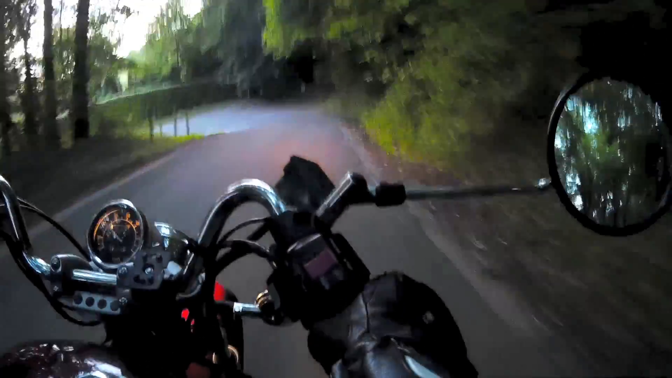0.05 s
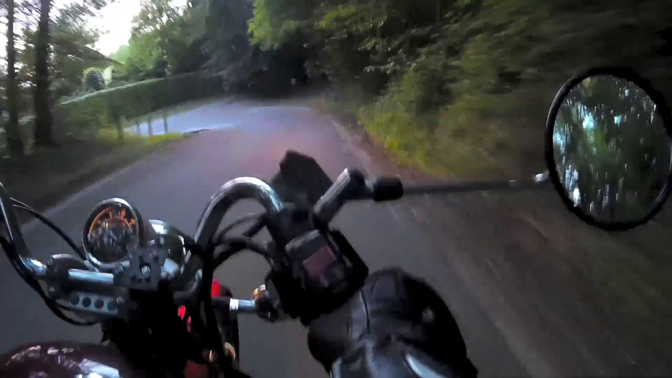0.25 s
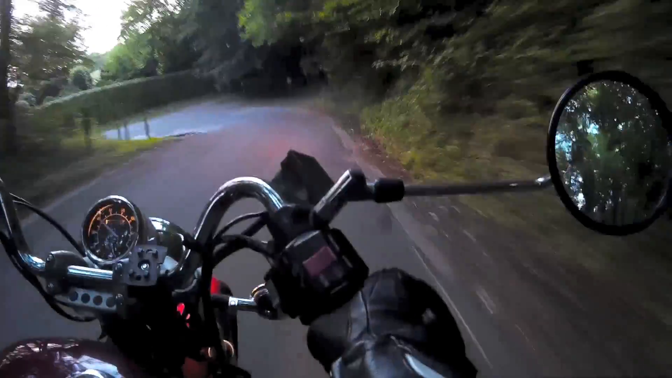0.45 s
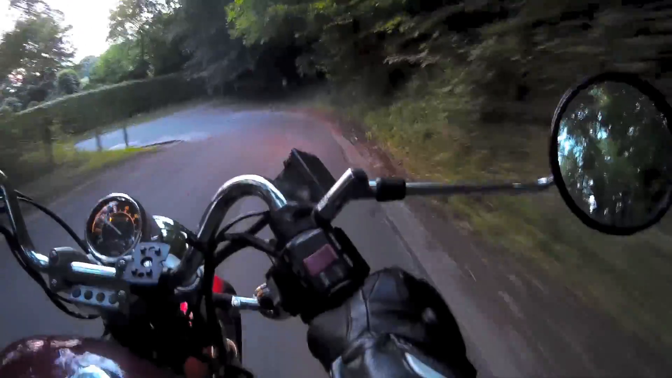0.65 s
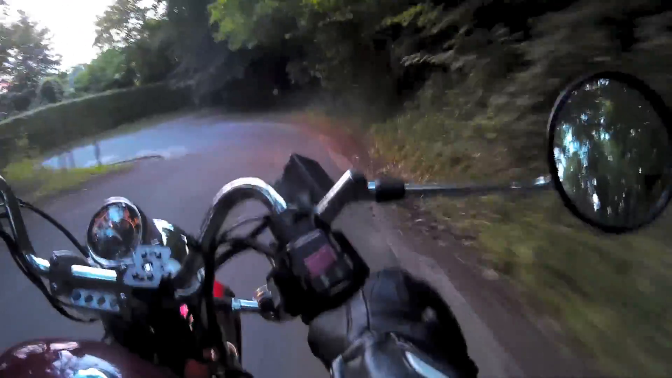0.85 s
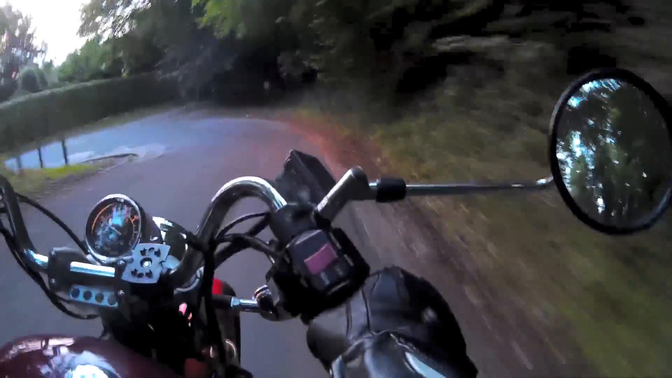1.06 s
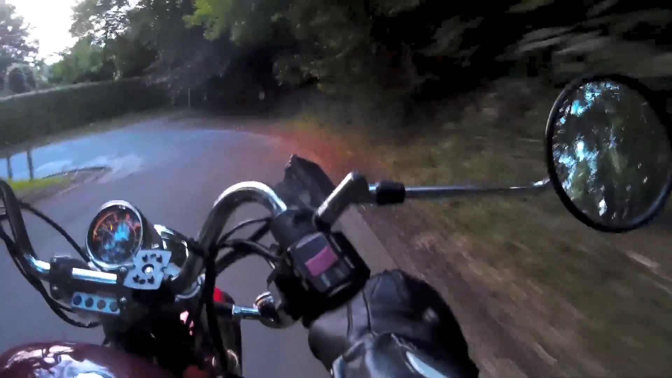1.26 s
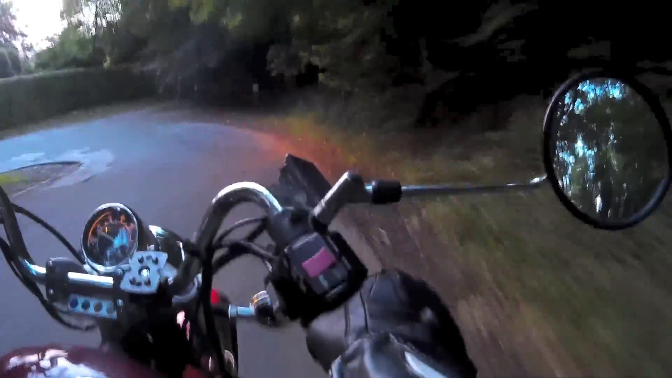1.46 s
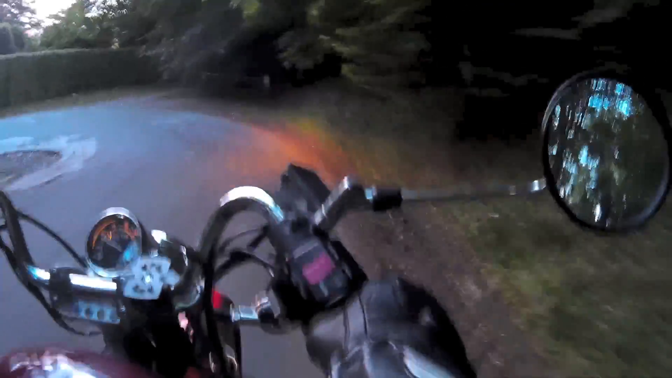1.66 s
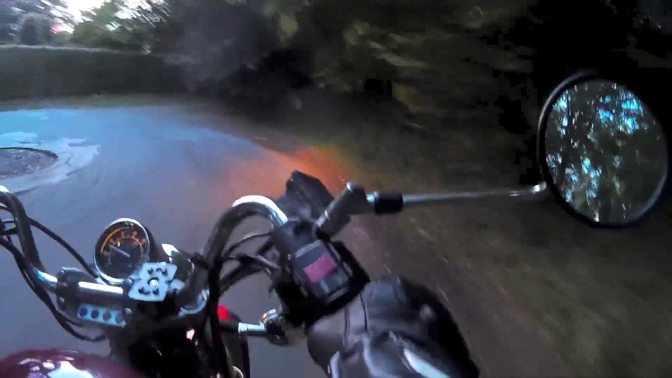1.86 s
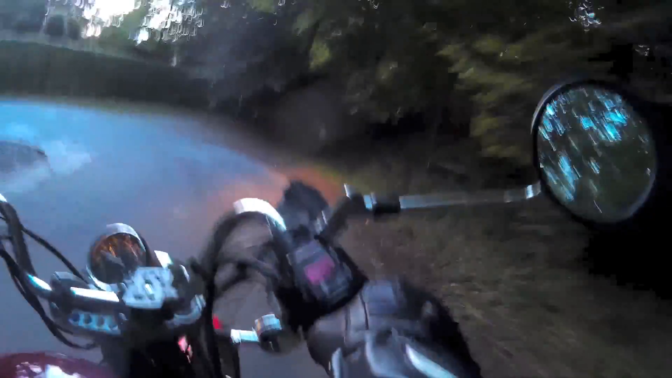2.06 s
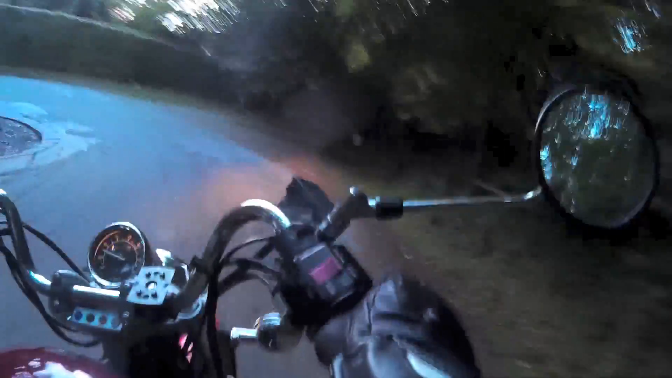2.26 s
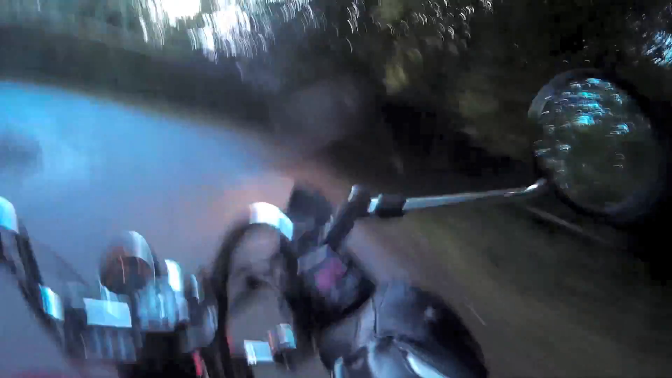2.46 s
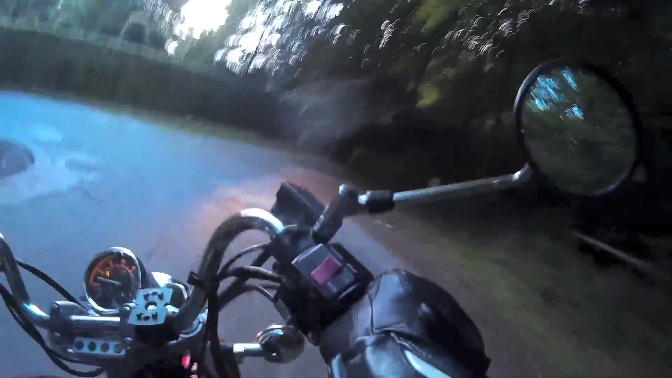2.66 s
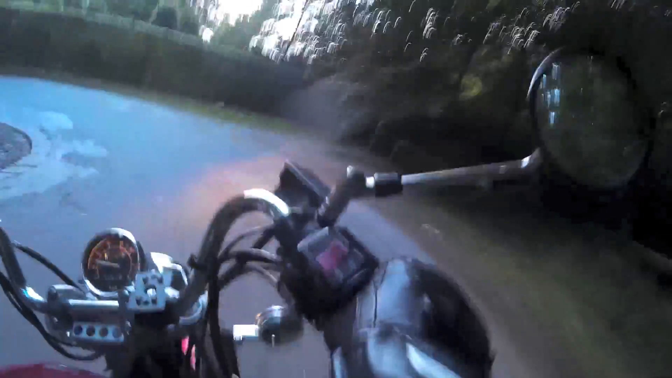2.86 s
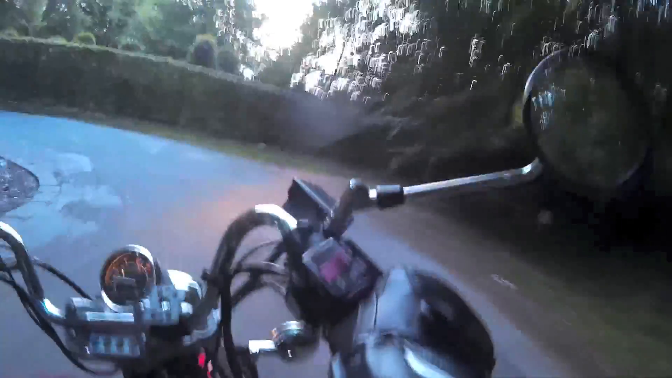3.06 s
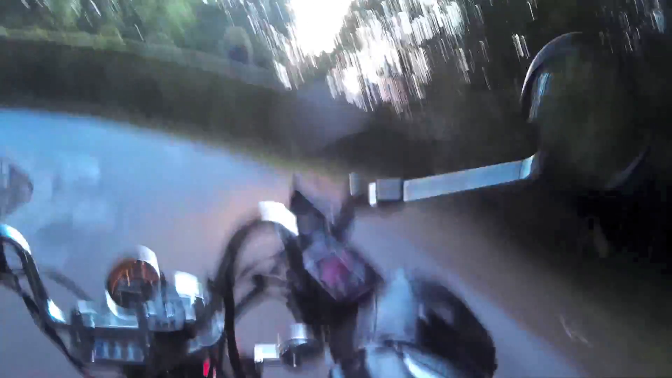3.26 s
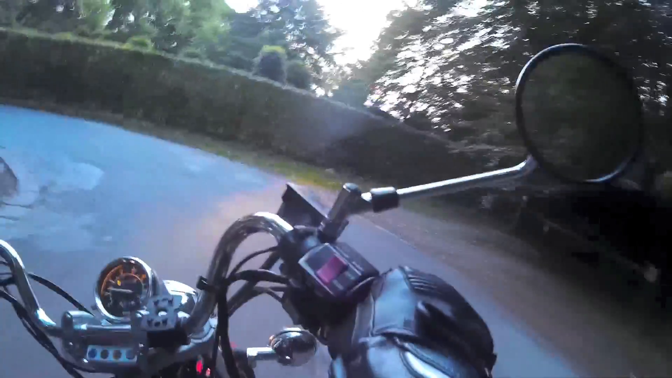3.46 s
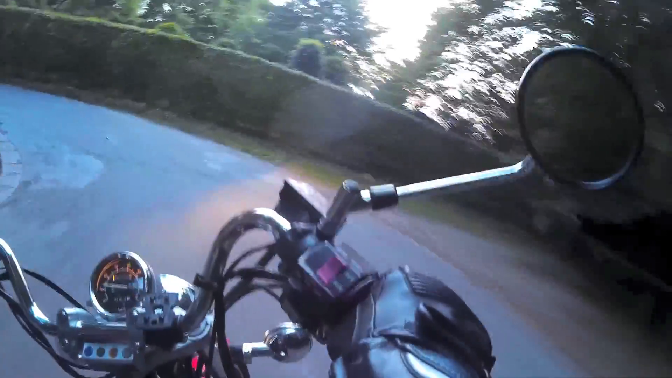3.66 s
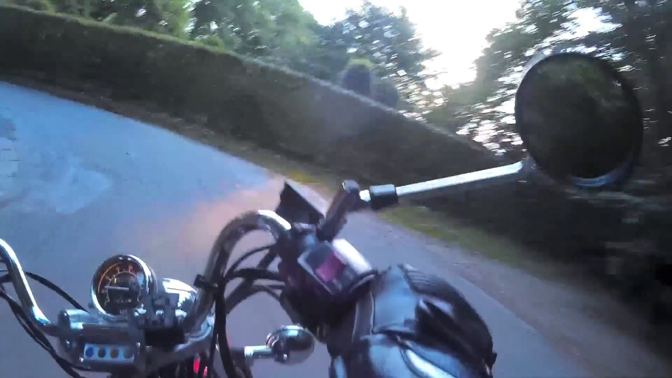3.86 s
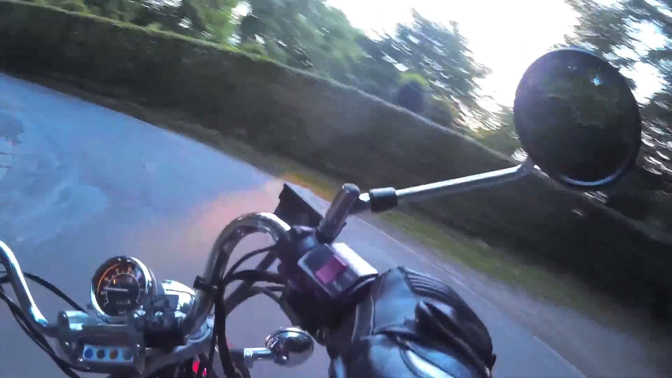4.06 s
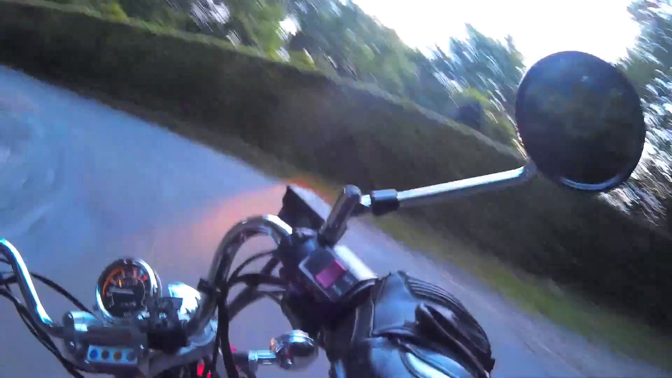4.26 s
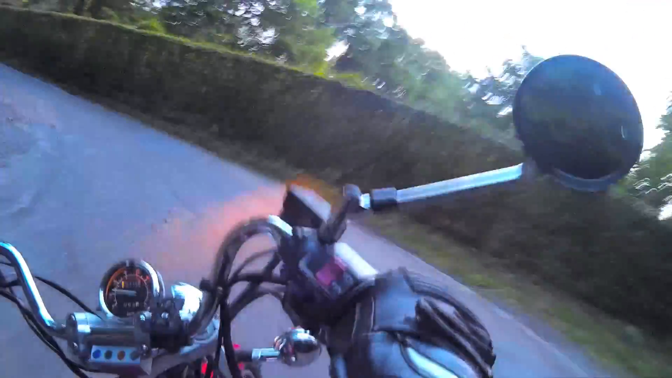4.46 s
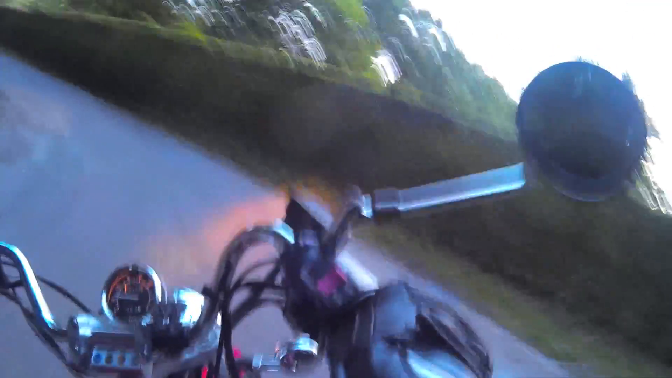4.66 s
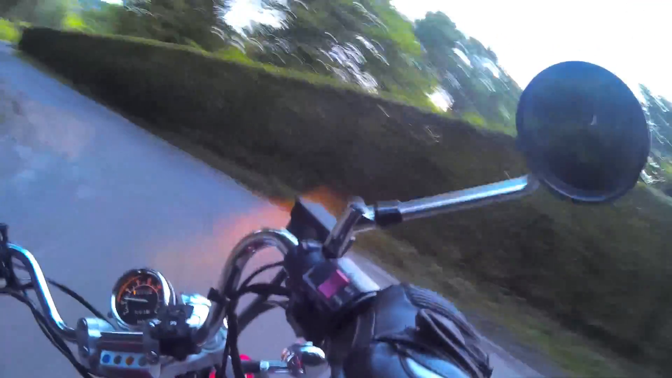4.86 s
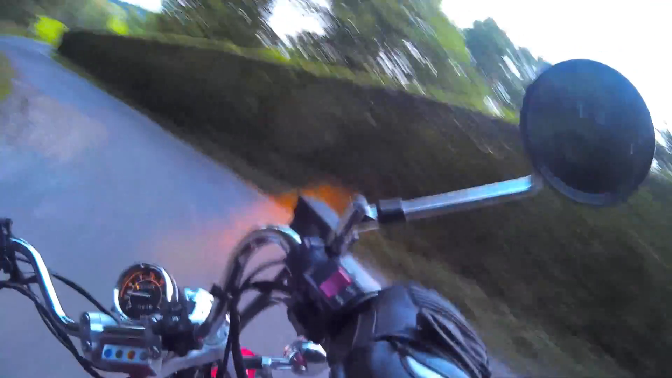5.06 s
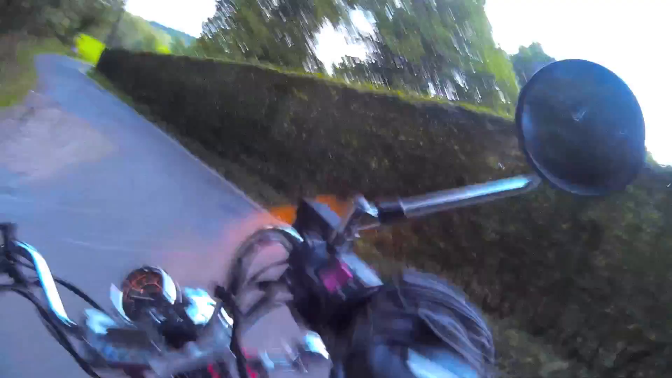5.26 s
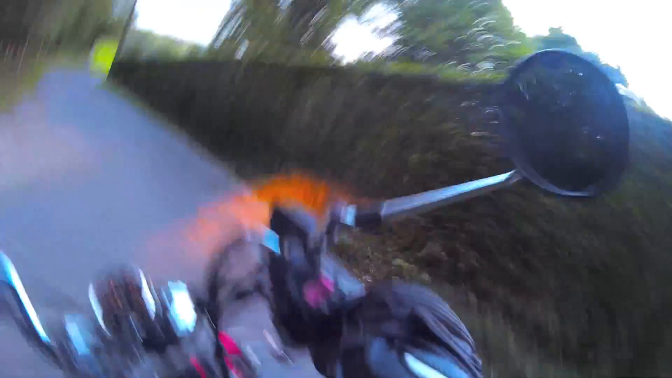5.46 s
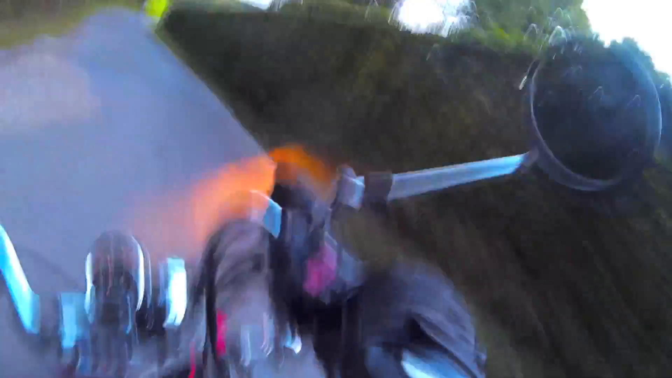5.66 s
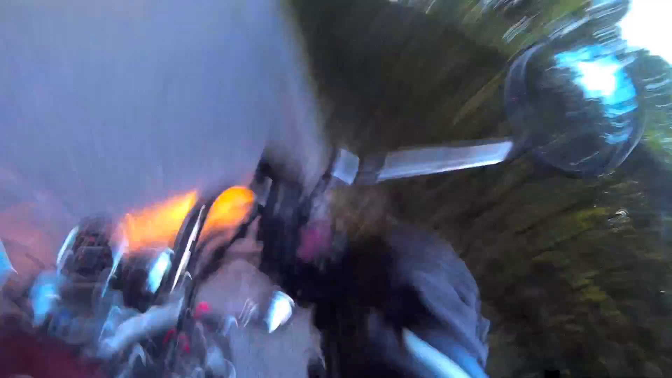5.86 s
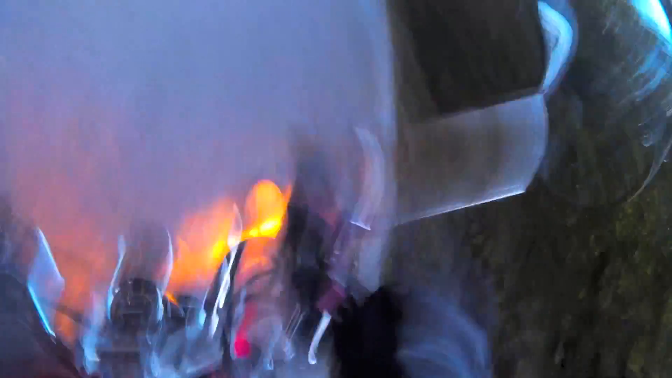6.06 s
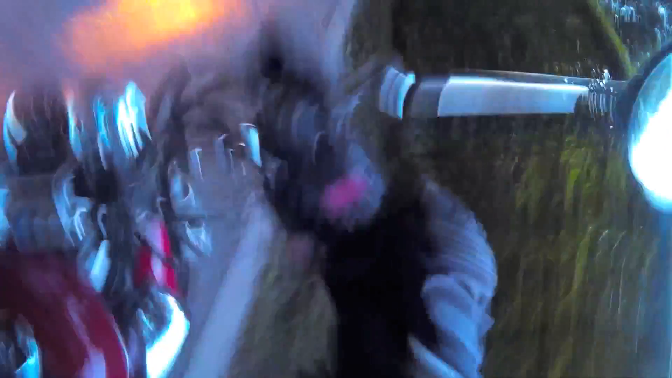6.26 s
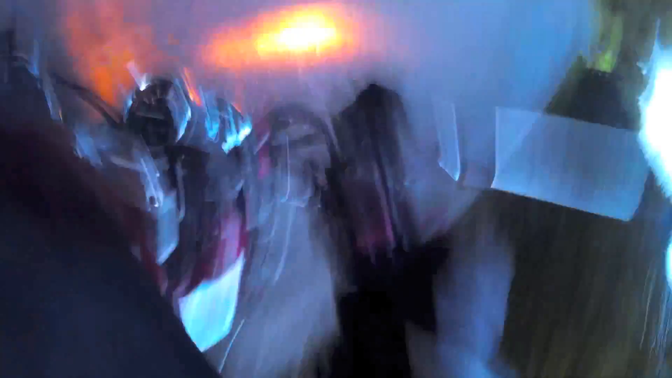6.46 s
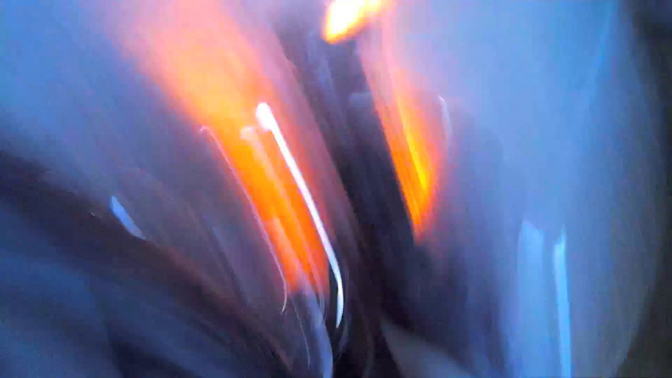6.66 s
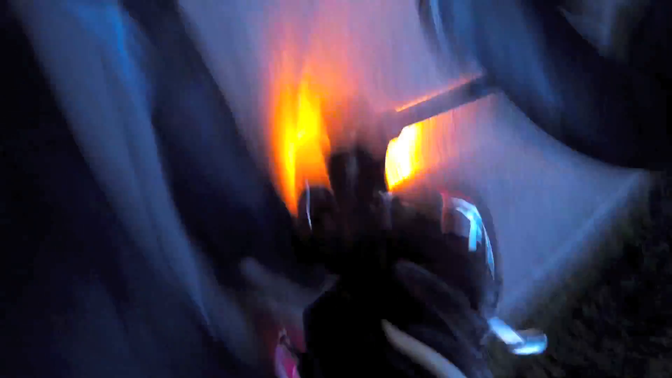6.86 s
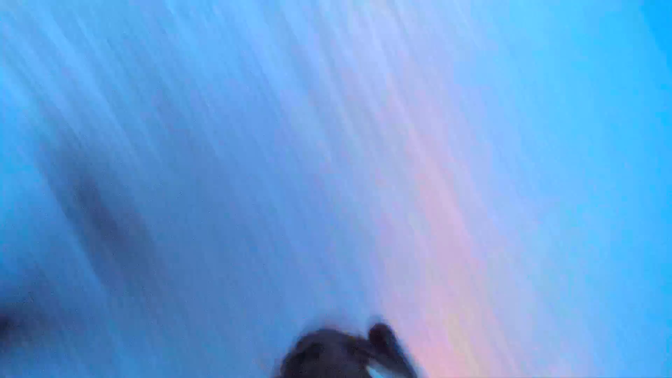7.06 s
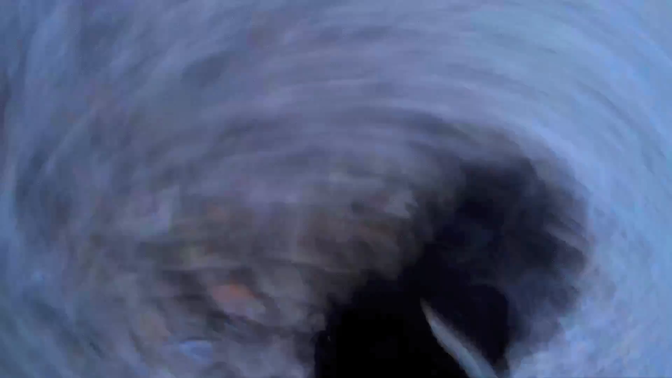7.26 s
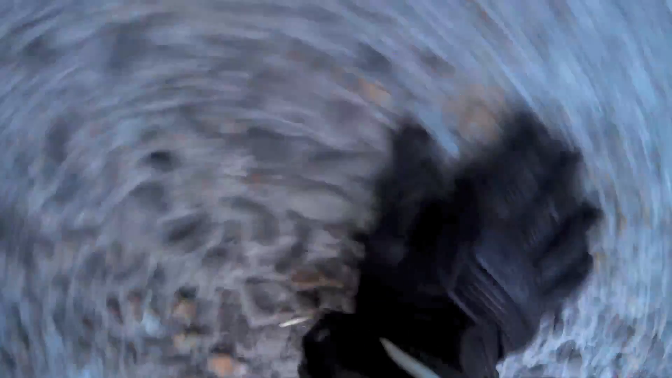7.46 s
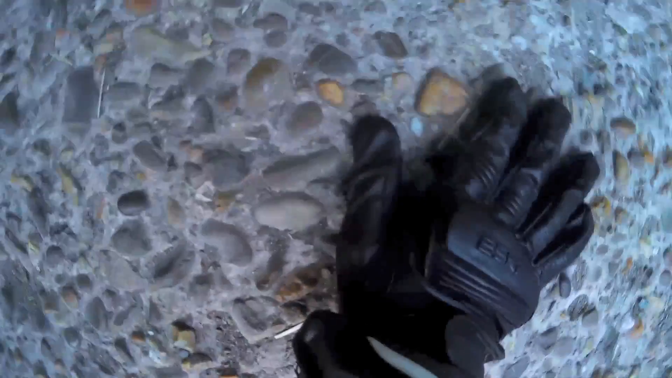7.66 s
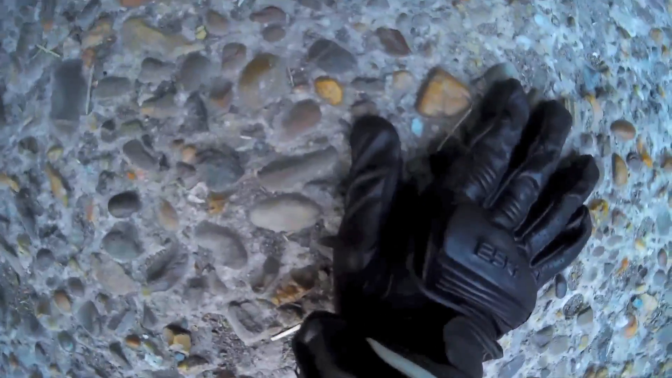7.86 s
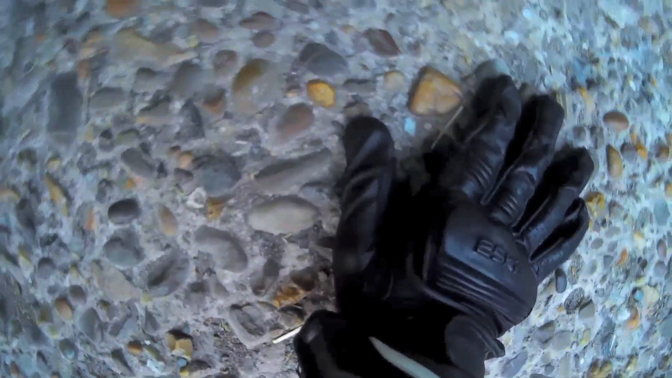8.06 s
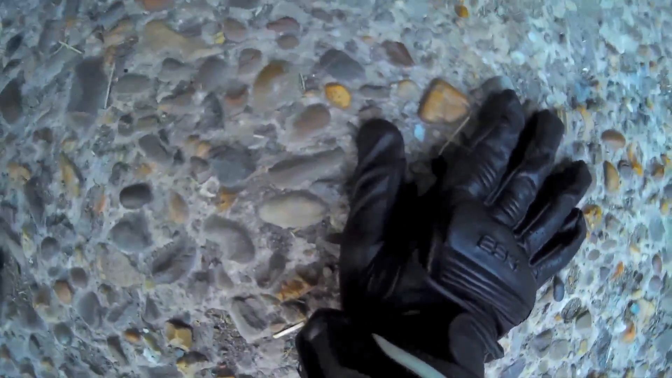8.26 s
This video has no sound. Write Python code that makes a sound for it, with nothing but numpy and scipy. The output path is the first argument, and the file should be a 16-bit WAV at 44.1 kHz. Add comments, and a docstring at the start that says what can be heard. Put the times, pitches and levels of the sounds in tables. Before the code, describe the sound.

Loose plastic camera housing knocks and rattles ever more densely over low wind rumble, then heavy thuds of a motorcycle fall give way to faint puttering idle.

```python
"""A small camera rattles in its loose plastic housing on a motorcycle that slows through a bend and topples.
Throughout, wind and jolts rumble, road noise seeps through the shell, electronics whine over faint hiss.
First light knocks ring the shell and a brake squeaks each wheel turn; then knocks crowd and a latch ticks.
From 5.7 s the rider tumbles: padded thuds swing the mount and rubbed plastic squeaks once.
From 7.5 s the rattle dies away and the fallen engine idles, two firings puffing each cycle."""
import sys
import numpy as np
from scipy import signal
from scipy.io import wavfile

SR = 44100
rng = np.random.default_rng(int(sys.argv[2]) if len(sys.argv) > 2 else 0)


def store_pcm(level_fs):
    """Save levels as 16-bit WAV."""
    pcm = np.round(np.clip(level_fs, -1, 1) * 32767).astype(np.int16)
    wavfile.write(sys.argv[1], SR, np.atleast_2d(pcm).T)


N = 366471

# Clear knocks of body on shell. Each row: start in seconds, strength in dB.
CLEAR_KNOCKS = [(0.0971, -17.5), (0.1449, -24), (0.2687, -21.5), (0.3272, -22), (0.3587, -29.5),
                (0.5773, -19), (0.7389, -11.5), (0.758, -27), (0.8498, -12.5), (0.8739, -12),
                (0.9952, -12.5), (1.0134, -14), (1.1741, -11.5), (1.2021, -18), (1.2799, -21.5),
                (1.366, -7), (1.3988, -22), (1.4573, -7.5), (1.482, -15.5), (1.54, -18), (1.5753, -20),
                (1.642, -16), (1.7076, -7.5), (1.7283, -6.5), (1.7601, -8), (1.7879, -2.5), (1.8051, -9),
                (1.894, -3.5), (1.9208, -15), (1.9749, -8.5), (2.0236, -12.5), (2.0687, -4), (2.1791, -17),
                (2.2339, -6), (2.3376, -16), (2.3687, -11), (2.401, -4), (2.4458, -18.5), (2.5073, -9),
                (2.56, -8), (2.6512, -9), (2.7668, -17.5), (2.797, -13.5), (2.8424, -13.5), (2.8817, -6.5),
                (2.93, -14.5), (2.984, -9.5), (3.0402, -14), (3.0986, -8.5), (3.1539, -2.5),
                (3.2122, -14.5), (3.2595, -2.5), (3.307, -3), (3.3574, -5.5), (3.476, -9.5), (3.521, -25.5),
                (3.584, -19), (3.6078, -20.5), (3.6245, -22.5), (3.6652, -21.5), (3.687, -20),
                (3.7894, -13), (3.8177, -11.5), (3.8527, -6.5), (3.8887, -11.5), (3.9819, -17),
                (4.0198, -10), (4.1445, -19), (4.1786, -14), (4.2288, -6), (4.2637, -10.5), (4.3151, -19.5),
                (4.3862, -24.5), (4.4134, -13), (4.4568, -18), (4.5069, -13), (4.5464, -11.5),
                (4.6026, -18), (4.6308, -18), (4.6624, -2), (4.7048, -2), (4.7337, -2.5), (4.7928, -2),
                (4.8319, -5.5), (4.8995, -7), (4.9476, -10), (5.0512, -8), (5.1009, -8.5), (5.1469, -13.5),
                (5.2063, -14), (5.2575, -5.5), (5.3339, -2.5), (5.3667, -8.5), (5.4192, -7), (5.45, -0.5),
                (5.5116, -6), (5.6614, 5.5), (5.6836, -4), (5.7172, -1), (5.7534, -17.5), (5.8494, -7.5),
                (5.8769, -8), (5.9415, 2), (5.9946, 1), (6.1005, 0), (6.1527, -1.5), (6.2462, -11.5),
                (6.2869, 4), (6.3324, -8.5), (6.3675, -14.5), (6.3852, -4), (6.4233, -17), (6.516, -3.5),
                (6.5477, -14), (6.5853, -1), (6.713, -10.5), (6.7661, -8), (6.781, -3.5), (6.8314, -9.5),
                (6.896, -8), (6.9104, -10.5), (7.0269, -9.5), (7.0694, -12.5), (7.0868, -11),
                (7.0975, -6.5), (7.229, -20.5), (7.2589, 4.5), (7.2926, -10), (7.319, 3), (7.3406, -12),
                (7.3739, -7.5), (7.4392, -13), (7.5088, -13), (7.523, -18.5), (7.6848, -32), (8.118, -42)]
# Bright latch ticks, many about 10 ms after a knock, some together with one.
# Each row: start in seconds, strength in dB.
LATCH_TICKS = [(0.8977, -31), (1.0206, -28), (1.4374, -28), (1.4893, -16.5), (1.5385, -25.5),
               (1.5876, -25.5), (1.7134, -20), (1.737, -9), (1.7707, -10.5), (1.8133, -19.5),
               (1.9972, -20.5), (2.0328, -17), (2.1265, -20.5), (2.2452, -16.5), (2.4098, -15),
               (2.5341, -22), (2.6138, -24), (2.7156, -22.5), (2.806, -21), (2.8534, -19), (2.8938, -14.5),
               (2.938, -20), (2.9919, -18), (3.039, -19), (3.1068, -13.5), (3.1281, -17), (3.1692, -11),
               (3.2185, -19), (3.267, -8.5), (3.3218, -18.5), (3.3675, -12.5), (3.4119, -16.5),
               (3.49, -20.5), (3.8287, -22.5), (3.866, -23), (3.913, -26), (3.9484, -22), (3.994, -17),
               (4.2047, -22.5), (4.2467, -30), (4.2748, -17), (4.4224, -21.5), (4.5136, -30),
               (4.6139, -17.5), (4.6503, -24), (4.6737, -7.5), (4.7141, -13), (4.7453, -12.5), (4.808, -16),
               (4.856, -20.5), (4.9115, -20), (4.9643, -20), (5.0574, -17.5), (5.1175, -23.5),
               (5.1557, -15), (5.2325, -26), (5.2669, -17.5), (5.3021, -16.5), (5.345, -6), (5.4284, -15.5),
               (5.4641, -18), (5.5194, -19.5), (5.6151, -14.5), (5.6671, -13), (5.69, -13), (5.7473, -20),
               (5.769, -22), (5.8619, -9), (5.8847, -9.5), (5.9524, -18), (6.1004, -3), (6.2242, -17.5),
               (6.25, -19), (6.3415, -13), (6.44, -17.5), (6.4596, -26), (6.5853, -8.5), (6.7904, -17.5),
               (7.0469, -20), (7.092, -19), (7.1032, -16), (7.157, -24.5), (7.2586, -0.5), (7.2756, -16),
               (7.3692, -21), (7.44, -12.5), (7.5197, -20.5)]
# Course of the ride. Each row: time in seconds, wind and jolt rumble in dB, road noise in dB,
# light chatter of the loose parts in dB.
RIDE_LEVELS = [(0.0, -47, -45.5, -60), (0.99, -42, -49.5, -53), (1.8, -38.5, -41, -42.5),
               (2.03, -46.5, -47.5, -46.5), (3.199, -43.5, -46.5, -44.5), (3.6, -46.5, -44.5, -46.5),
               (4.15, -47, -45.5, -55), (4.75, -44, -44.5, -47), (5.65, -38.5, -51.5, -41),
               (5.85, -24.5, -32, -39), (6.64, -19, -33, -34), (6.95, -31.5, -46, -45.5),
               (7.1, -33, -36.5, -35.5), (7.38, -41, -35, -38), (7.55, -51.5, -46, -50),
               (7.73, -56, -62, -67.5), (8.31, -55.5, -82, -90)]
# Resonances of the plastic shell. Each row: frequency in Hz, level in dB, t60 in seconds.
SHELL_MODES = [(582, -19, 0.04), (759, -23.5, 0.042), (1040, -8, 0.013), (1300, -8.5, 0.017),
               (1569, -6, 0.013), (1841, -3.5, 0.013)]
# Resonances of the latch. Each row: frequency in Hz, level in dB, t60 in seconds.
LATCH_MODES = [(1684, -3.5, 0.0044), (3908, -2.5, 0.004), (4710, -4.5, 0.0031), (5695, -7.5, 0.0042),
               (7540, -16, 0.0048), (9080, -21, 0.0068), (10880, -18, 0.0048), (13500, -42, .003)]
# Resonances of the helmet under the mount. Each row: frequency in Hz, level in dB, t60 in seconds.
HELMET_MODES = [(155, -7, 0.025), (298, -6, 0.015), (423, -11, .012)]
# Road noise inside the shell. Each row: frequency in Hz, relative level in dB per Hz.
ROAD_SPECTRUM = [(60, -1), (150, -0.5), (300, -7), (650, -17), (1700, -12), (2350, -21.5), (2700, -44.5),
                 (3700, -25.5), (4500, -30.5), (5200, -40), (7000, -43.5), (12000, -50)]
# Microphone and far background. Each row: frequency in Hz, relative level in dB per Hz.
HISS_SPECTRUM = [(24, -34), (40, -14), (176, -10), (491, -26), (9690, -40), (16000, -44)]
# Padded thuds of the tumbling rider. Each row: start in seconds, strength in dB, pitch in Hz.
TUMBLE_THUDS = [(5.688, -14.5, 34.5), (6.177, -5.5, 41), (6.398, -6.5, 35.3), (6.554, -6, 50),
                (6.607, 2.5, 56), (6.663, -4.5, 45), (6.741, -7, 34.8), (6.789, 0, 96.5),
                (7.277, -8.5, 38.7), (7.337, -5.5, 81)]

IDLE_CYCLE_S, IDLE_FROM_S = 0.098, 7.535


def amp(db):
    """dB to gain."""
    return 10 ** (np.asarray(db) / 20)


def rms_one(x):
    """Scale to rms 1."""
    return x / np.sqrt(np.mean(x ** 2) + 1e-20)


def drift(rate_hz):
    """Random wander of rms 1: white noise through a double one-pole low-pass."""
    r = np.exp(-2 * np.pi * rate_hz / SR)
    white = rng.standard_normal(N + SR)
    settled = signal.lfilter([1], [1, -2 * r, r * r], white)[SR:]
    return rms_one(settled)


def ring(clicks, hz, t60_s):
    """Two-pole resonator: a unit click starts a decaying sine of height 1."""
    r = amp(-60 / (t60_s * SR))
    w = 2 * np.pi * hz / SR
    return signal.lfilter([0, np.sin(w)], [1, -2 * r * np.cos(w), r * r], clicks + 1e-18)


def band(x, low_hz, high_hz):
    """Butterworth band-pass."""
    return signal.sosfilt(signal.butter(2, [low_hz, high_hz], "band", fs=SR, output="sos"), x)


def low_pass(x, order, cutoff_hz):
    """Butterworth low-pass."""
    return signal.sosfilt(signal.butter(order, cutoff_hz, fs=SR, output="sos"), x)


def decay(x, time_s):
    """Each click leaves an exponential tail with this time constant."""
    return signal.lfilter([1], [1, -np.exp(-1 / (time_s * SR))], x)


def coloured(spectrum, patchy_db):
    """Third-octave bands of noise, each with its level and flicker; rms 1."""
    hz, level_db = np.transpose(spectrum)
    edges_hz = 40 * 2 ** (np.arange(27) / 3)
    white = rng.standard_normal((2, N))
    flicker = [drift(28.0) for _ in range(4)]  # shared among the bands
    out = 0
    for k, (low_hz, high_hz) in enumerate(zip(edges_hz, edges_hz[1:])):
        centre_db = np.interp(np.log(low_hz * high_hz) / 2, np.log(hz), level_db)
        gain = amp(centre_db + patchy_db * flicker[k % 4])
        out = out + gain * band(white[k % 2], low_hz, high_hz)
    return rms_one(out)


def rattle(chatter_db):
    """Dull knocks with thumps under them and bright ticks; a rough ride brings clumps of small touches."""
    loose_db = chatter_db + 5.5 * drift(30)
    blows = all_knocks(chatter_db, count=80)
    knocks = strike(blows, SHELL_MODES, loose_db + 8.0, spread_db=4.5, skid_db=-8.5, skid_s=0.0021,
                    bounce_db=-7, settle_s=0.005, per_s=800, contact_hz=2810)
    padded = blows * [1, 0.7] - [0, 5.0]  # the padded mount gives less to hard knocks
    thumps = strike(padded, HELMET_MODES, loose_db, spread_db=3.0, skid_db=-16, skid_s=0.003,
                    bounce_db=-12, settle_s=0.006, per_s=250, contact_hz=1207)
    ticks = strike(LATCH_TICKS, LATCH_MODES, loose_db - 3.5, spread_db=3.5, skid_db=-11.5, skid_s=0.0009,
                   bounce_db=-2, settle_s=0.0028, per_s=2500, contact_hz=16200)
    jolts = blows * [1, 0.93] + [0, -13.5]  # each knock also jolts the latch dully
    cracks = strike(jolts, LATCH_MODES, loose_db - 2, spread_db=5.0, skid_db=-12.5, skid_s=0.0018,
                    bounce_db=-6.5, settle_s=0.0039, per_s=2500, contact_hz=6000)
    return knocks + thumps + ticks + cracks


def all_knocks(chatter_db, count):
    """The clear knocks, plus light ones at random times whose strength follows the roughness of the ride."""
    chance = rng.random((count, 2))
    start_s = chance[:, 0] * IDLE_FROM_S
    spread_db = -1.5 * np.log(chance[:, 1] + 0.016)  # mostly weak, a few stronger
    strength_db = chatter_db[(start_s * SR).astype(int)] + 21.5 + spread_db
    return np.vstack([CLEAR_KNOCKS, np.transpose([start_s, strength_db])])


def strike(table, modes, loose_db, spread_db, skid_db, skid_s, bounce_db, settle_s, per_s, contact_hz):
    """The loose part skids in, hits, bounces and settles; between blows it chatters at the level loose_db."""
    start_s, strength_db = np.transpose(table)
    at = np.round(start_s * SR).astype(int)
    blows = np.zeros(N)
    blows[at] = amp(strength_db)
    bounces = amp(bounce_db) * decay(blows, settle_s)
    skids = amp(skid_db) * decay(blows[::-1], skid_s)[::-1]  # time-reversed: swells into the blow
    touches = rng.standard_normal(N) * (rng.random(N) < per_s / SR)
    stray = amp(loose_db) * (rng.random(N) < 160 / per_s)  # about 160 lone touches a second
    clicks = touches * (skids + bounces + stray)
    return resound(clicks, at, strength_db, modes, spread_db, contact_hz)


def resound(clicks, at, strength_db, modes, spread_db, contact_hz):
    """Each blow and small click drives every mode with a strength of its own; soft contact dulls them."""
    uneven = rng.standard_normal((len(at), len(modes)))
    out = 0
    for k, (hz, level_db, t60_s) in enumerate(modes):
        push = clicks * (1 + rng.standard_normal(N))
        push[at] += amp(strength_db + spread_db * uneven[:, k])
        out = out + (-1) ** k * amp(level_db) * ring(push, hz, t60_s)
    return low_pass(out, 2, min(contact_hz, 20000))


def tumble(cycles):
    """Each thud is a heavily damped swing of the microphone's mount; one rub of plastic squeaks."""
    thuds = np.zeros(N)
    for start_s, strength_db, hz in TUMBLE_THUDS:
        click = np.zeros(N)
        click[round(start_s * SR)] = amp(strength_db)
        thuds += ring(click, hz, cycles / hz)
    thuds = low_pass(thuds, 1, 300)
    rub = np.interp(np.arange(N) / SR, 6.997 + np.array([0, 0.003, 0.018]), [0, 1, 0])
    squeak = rms_one(ring(rng.standard_normal(N), hz=2800, t60_s=0.016))
    return thuds + amp(-30) * rub * squeak


def rumble(level_db):
    """Lumpy wind and jolt pressure at the port: low noise with a wandering level."""
    low = band(band(rng.standard_normal(N), 13, 140), 6.1, 42)
    return amp(level_db + 1.1 * drift(16)) * rms_one(low)


def road_noise(level_db):
    """Road noise dulled by its way through the shell: coloured, flickering noise."""
    return amp(level_db) * coloured(ROAD_SPECTRUM, patchy_db=4.0)


def idle(level_db, second_db, second_share):
    """The fallen twin ticks over: a strong and a weak firing each cycle puff into the exhaust."""
    first_s = np.arange(IDLE_FROM_S, N / SR - IDLE_CYCLE_S, IDLE_CYCLE_S)
    second_s = first_s + second_share * IDLE_CYCLE_S
    at = (np.append(first_s, second_s) * SR).astype(int)
    strength_db = level_db + np.repeat([0, second_db], len(first_s))
    exhaust_modes = [(165, 0, 0.06), (320, -4, 0.03)]  # Hz, dB, t60 in seconds
    return resound(np.zeros(N), at, strength_db, exhaust_modes, spread_db=2.5, contact_hz=900)


def brake(count):
    """Two spots on the disc squeak each turn as the wheel slows: bursts of noise in one narrow band."""
    first_turn_s, turn_s, slowing_s = 0.268, 0.235, 0.017  # each turn lasts slowing_s longer
    level_db, centre_hz = -71, 12350
    t = np.arange(N) / SR
    turn = np.arange(count)
    length_s = turn_s + slowing_s * turn
    turn_start_s = first_turn_s + np.cumsum(length_s) - length_s
    gate = 0
    # each spot: share of a turn later, level in dB, rise in dB per turn
    for share, spot_db, rise_db in [(0, 0, 2), (0.2, -3, 3.5)]:
        for s, gain_db in zip(turn_start_s + share * length_s, rise_db * turn):
            burst = np.interp(t, [s, s + 0.008, s + 0.05], [0, 1, 0])
            gate = gate + amp(level_db + spot_db + gain_db) * burst
    return gate * rms_one(band(rng.standard_normal(N), centre_hz - 200, centre_hz + 200))


def whine():
    """Electronic whistle, narrow and unsteady: noise through one resonance."""
    return amp(-78) * rms_one(ring(rng.standard_normal(N), hz=9540, t60_s=0.02))


def hiss():
    """Microphone and far background: steady coloured noise with slight flicker."""
    return amp(-58.5) * coloured(HISS_SPECTRUM, patchy_db=2.5)


def scene():
    """All sources at the single microphone."""
    time_s, *columns = np.transpose(RIDE_LEVELS)
    rumble_db, road_db, chatter_db = [np.interp(np.arange(N) / SR, time_s, c) for c in columns]
    main = rattle(chatter_db) + tumble(cycles=4.0)
    ride = rumble(rumble_db) + road_noise(road_db)
    machine = idle(level_db=-48, second_db=-4.5, second_share=0.57) + brake(count=8)
    return (main + ride + machine + whine() + hiss())[None]


def record(dry):
    """Gain control ducks after loud moments, the loudest knocks overload the input, the top is cut."""
    level_db = 20 * np.log10(np.abs(dry) + 1e-9)
    duck_db = 0.39 * np.maximum(level_db + 7.2, 0)  # threshold -7.2 dB
    slope_db = 60.0 * np.arange(N) / SR  # release of 60 dB a second
    held_db = np.maximum.accumulate(duck_db + slope_db, axis=1) - slope_db
    smooth_db = signal.lfilter([0.004], [1, -0.996], held_db)
    ducked = dry * amp(-smooth_db)
    limited = ducked / (1 + np.abs(ducked / 0.7) ** 6) ** (1 / 6)  # saturates at 0.7
    return signal.sosfilt(signal.cheby2(12, 70, 16600, fs=SR, output="sos"), limited)


dry = scene()
out = record(dry)
store_pcm(out)
```